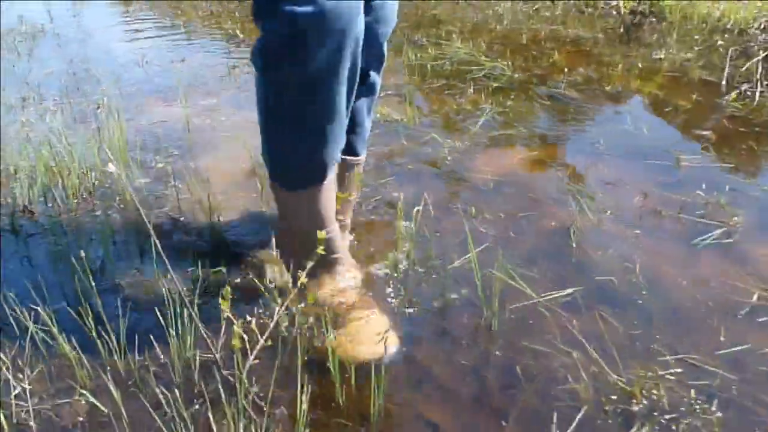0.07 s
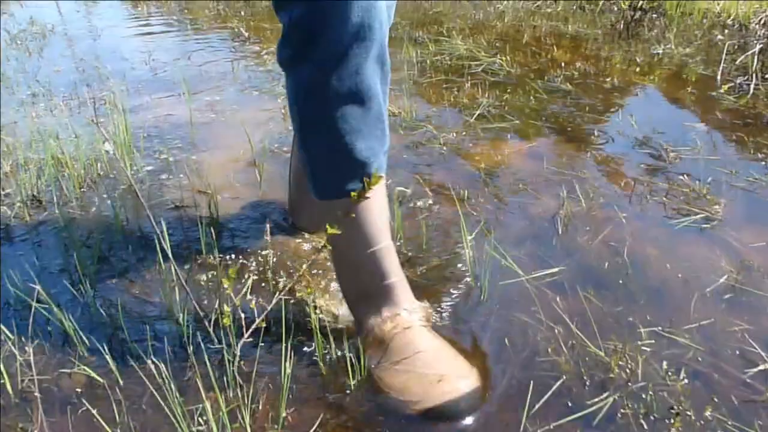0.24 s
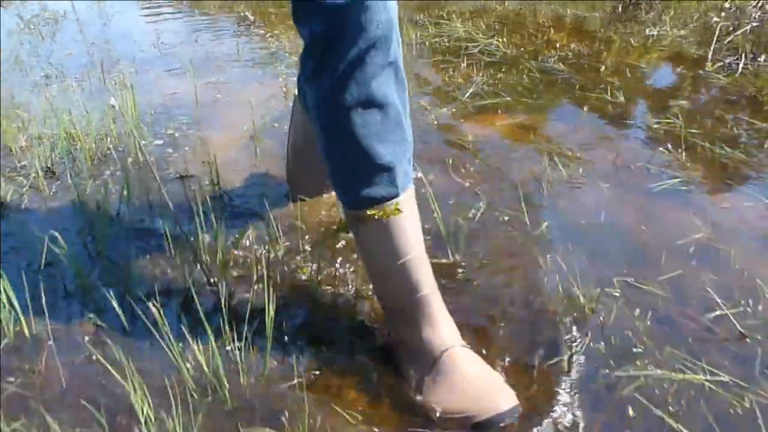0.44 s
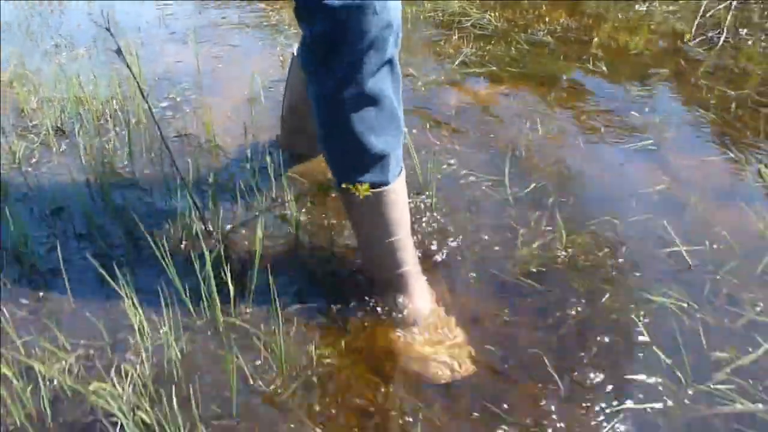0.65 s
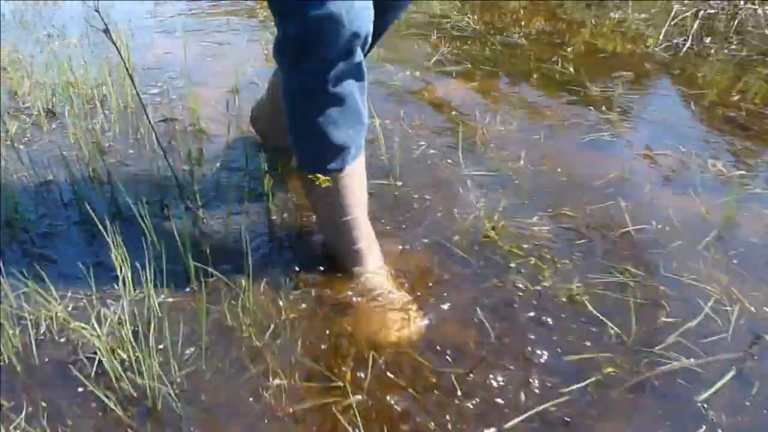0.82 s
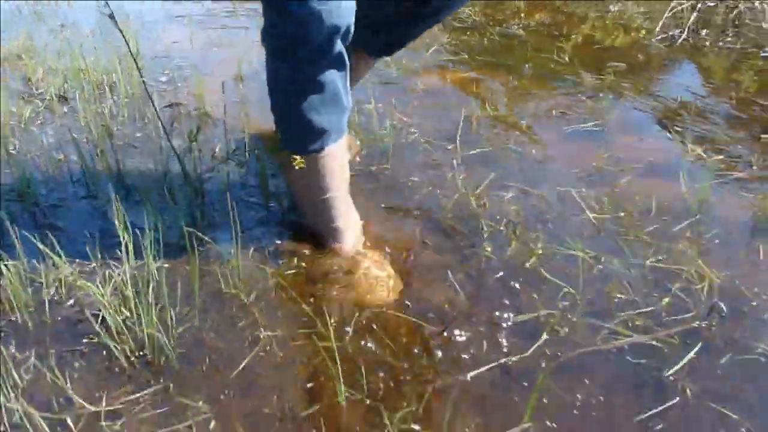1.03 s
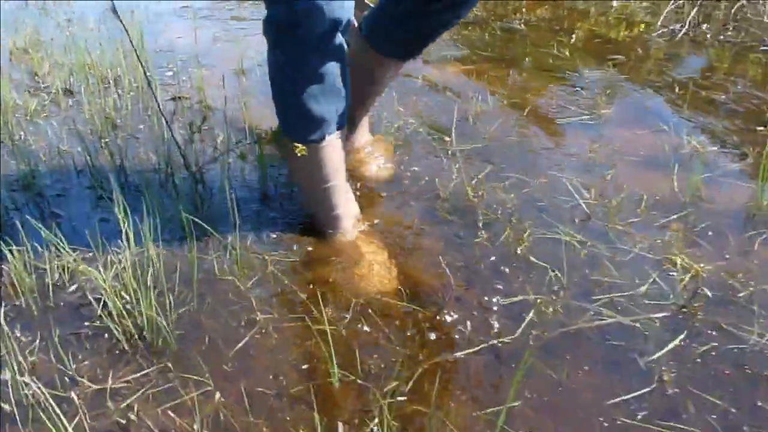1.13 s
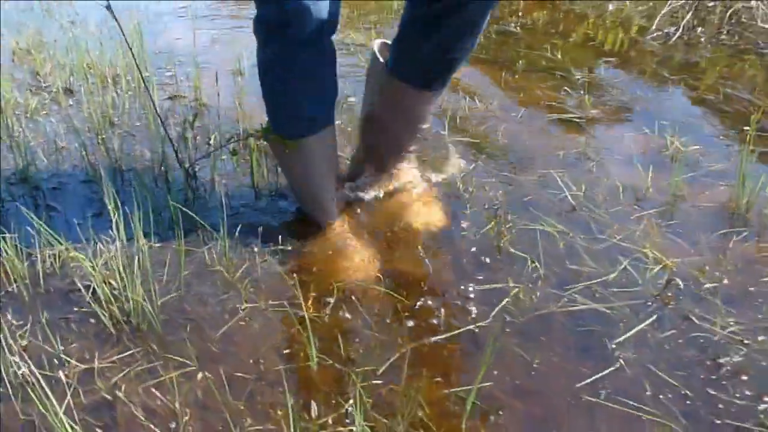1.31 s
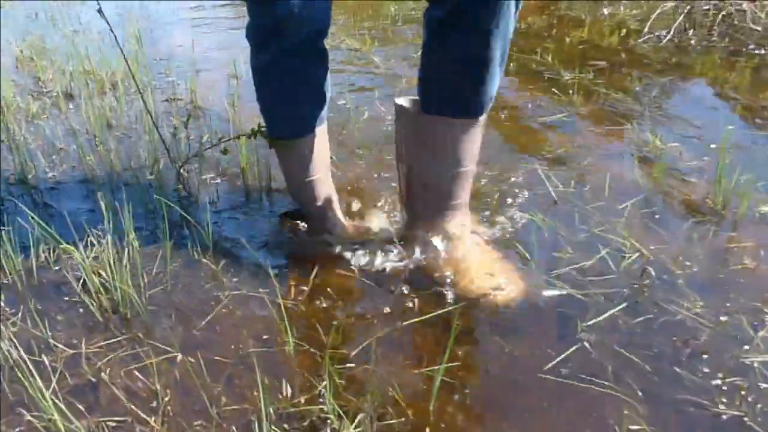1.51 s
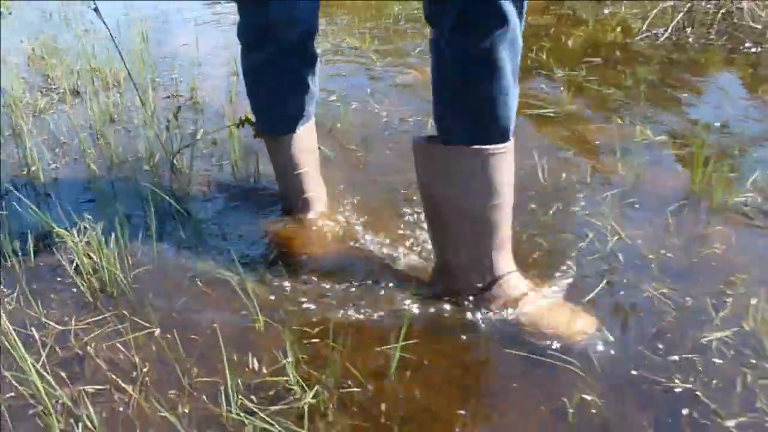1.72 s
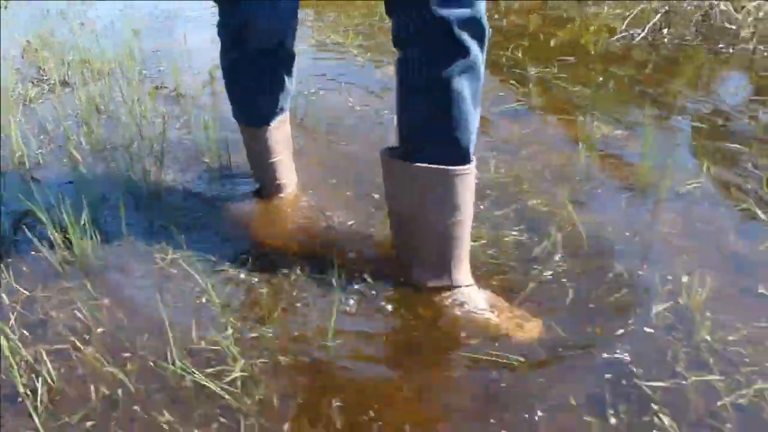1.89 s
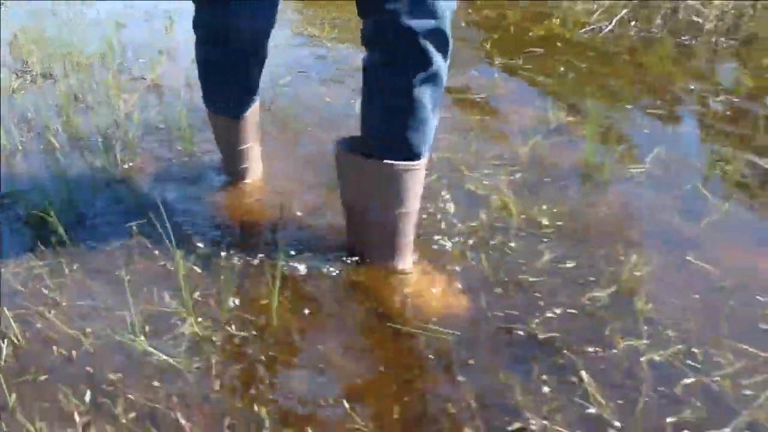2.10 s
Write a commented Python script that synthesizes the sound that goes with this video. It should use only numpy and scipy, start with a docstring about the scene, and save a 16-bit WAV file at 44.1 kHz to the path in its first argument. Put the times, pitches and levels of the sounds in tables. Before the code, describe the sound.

Close sloshing of boots wading two steps through shallow water, over a faint wind hiss.

```python
"""On a flooded meadow, close by, rubber boots wade two steps through shallow water.
Each boot slaps the surface and drags a wash of small bubbles and spray. Trapped air rings as a damped
oscillator: larger bubbles plop, most gliding upward, hollows gulp as they close, and falling drops tick.
A faint wind hisses in the grass."""
import sys
import numpy as np
from scipy import signal
from scipy.fft import rfft, irfft, next_fast_len
from scipy.io import wavfile
from scipy.ndimage import map_coordinates

SR = 44100
rng = np.random.default_rng(int(sys.argv[2]) if len(sys.argv) > 2 else 0)


def output_pcm(signal):
    """Save a mono or channel-first signal as 16-bit PCM at the path in sys.argv[1].

    Samples are clipped to [-1, 1] before scaling.
    """
    pcm = np.clip(np.atleast_2d(signal).T, -1, 1) * 32767
    wavfile.write(sys.argv[1], SR, np.round(pcm).astype(np.int16))


N = 94815

# envelope of the stirred water: time_s, level_db
STIRRING = [(0.08, -59), (0.18, -45.5), (0.26, -44), (0.42, -42.5), (0.465, -43), (0.535, -45),
            (0.6, -49.5), (0.78, -56.5), (0.99, -60.5), (1.04, -49.5), (1.11, -55), (1.25, -53.5),
            (1.4, -50.0), (1.6, -45.5), (1.7, -45.5), (1.84, -41.5), (1.98, -60), (2.13, -58.5)]
# left-right coherence of the wind and the rumble: frequency_hz, coherence
AIR_COHERENCE = [(60, 0.22), (200, 0.39), (500, 0.2), (2000, 0.18), (7000, 0.27)]
# left-right coherence of the water noise: frequency_hz, coherence
WATER_COHERENCE = [(150, .5), (500, 0.54), (7000, 0.29)]


def amp(db):
    """Decibels to amplitude ratio."""
    return 10 ** (np.asarray(db) / 20)


def unit_rms(x):
    """Normalisation to an rms of 1."""
    return x / np.sqrt(np.mean(x ** 2) + 1e-20)


def at_frequency(points, hz):
    """Interpolation of (frequency_hz, value) points on a logarithmic frequency axis."""
    knots_hz, values = np.transpose(points)
    return np.interp(np.log(hz + 1), np.log(knots_hz + 1), values)


def envelope(points):
    """Linear interpolation of (time_s, value) points at every sample."""
    return np.interp(np.arange(N) / SR, *np.transpose(points))


def wobble(rate_hz):
    """Random modulation: a spline through rate_hz Gaussian values a second."""
    return map_coordinates(rng.standard_normal(N // 10), [np.arange(N) * rate_hz / SR])


def filtered(x, response):
    """Linear filtering: the spectrum times a frequency response."""
    size = next_fast_len(N + SR // 2)
    return irfft(rfft(x, size) * response(np.fft.rfftfreq(size, 1 / SR)), size)[..., :N]


def stereo_noise(spectrum, coherence):
    """Partly coherent coloured noise of rms 1: the balance of mid and side sets the coherence."""
    def response(hz):
        angle = np.arccos(np.clip(at_frequency(coherence, hz), -1, 1)) / 2
        return amp(at_frequency(spectrum, hz)) * [np.cos(angle), np.sin(angle)]
    mid, side = filtered(rng.standard_normal((2, N)), response)
    return unit_rms(np.array([mid + side, mid - side]))


def place(start_s, sounds, pans=0):
    """Superposition of sounds, one a row, panned by amplitude."""
    index = (np.round(start_s * SR).astype(int) + np.arange(sounds.shape[1])).ravel()
    return np.array([np.bincount(index, (sounds * (1 + side * pans)).ravel(), N)[:N] for side in (1, -1)])


def wind():
    """Wind in the grass makes faint broadband flow noise, whose level sways slightly."""
    # noise spectrum: frequency_hz, density_db
    spectrum = [(15, -93), (25, -50), (209, -11.5), (236, -10), (272, -9), (345, -4.5), (380, -5.5),
                (642, -6), (1480, -18.5), (2220, -21), (2820, -19), (3490, -21), (7500, -27), (9750, -50.5),
                (16500, -120)]
    return amp(-53 + 2.1 * wobble(rate_hz=4.19)) * stereo_noise(spectrum, AIR_COHERENCE)


def bubble(t, hz, decay_s, rise_per_s, waver_cycles=0):
    """A damped oscillator of trapped air; a positive rise lifts its pitch as it nears the surface."""
    onset_cycles, burst_s = 0.55, 5.74 * decay_s  # bursting at the surface cuts the ring short
    onset = 1 - np.exp(-t * hz / onset_cycles)
    fade = np.exp(-t / decay_s - (t / burst_s) ** 4)
    cycles = hz * (t + rise_per_s * t * t / 2) + waver_cycles
    return np.sin(2 * np.pi * cycles) * fade * onset


def plops():
    """Large bubbles and single drops: a snap at pinch-off, then a resonance jostled by moving water."""
    # bubbles and drops that stand out: start_s, pitch_hz, level_db, decay_ms, relative_rise_per_s
    bubbles = [ (.008, 1036, -35.5, 8.2, 18), (0.1222, 4870, -18, 0.4, 18), (0.1264, 2480, -26, 0.83, 15),
               (0.2338, 3580, -24, 0.67, -10), (0.2453, 2230, -29, 0.75, -6), (0.261, 1210, -23.5, 2, 29),
               (0.274, 1422, -28, 7, 11.5), (0.3186, 3870, -20, 1.17, 1), (0.3203, 2910, -16.5, 0.51, 4),
               (.3197, 743, -30.5, 7.3, -5), (.349, 664, -30.5, 6.2, 17), (0.3665, 3100, -20.5, 0.57, -10),
               (0.3794, 6240, -18.5, 0.36, -2), (0.3886, 3120, -23, 1.3, -10),
               (0.451, 1073, -31.5, 32, 15.5), (0.4702, 606, -13, 8.4, -3), (0.4707, 1500, -12.5, 0.92, 3),
               (0.486, 1403, -19, 4.5, 15.5), (0.4896, 3160, -22, 2.8, -7.5), (0.4862, 952, -24, 5.5, 7.5),
               (0.496, 1610, -23, 5.5, 78), (0.5359, 5730, -36, 1.8, 18), (0.5584, 6700, -32, 2.3, 17),
               (0.6367, 2086, -22, 1.7, 95), (0.641, 916, -39.5, 16, 1), (0.696, 3630, -39.5, 2.1, 12),
               (0.707, 1523, -43, 8.6, -1), (.908, 3600, -44, 1.2, -5), (1.02, 1445, -43, 2.5, 22),
               (1.032, 4400, -28.5, 0.29, 0), (1.037, 4120, -30.5, 0.42, -26), (1.04, 498, -39.5, 9, 8.5),
               (1.0603, 810, -30, 3.6, 8), (1.0955, 900, -38, 1.8, -19), (1.133, 1210, -28, 2.5, 3),
               (1.175, 2170, -34, 1.1, -9), (1.231, 1240, -41.5, 6.8, 11), (1.2682, 2780, -30.5, 1.07, -11),
               (1.273, 4620, -19, 0.89, 13), (1.3434, 840, -16, 1.93, -11), (1.312, 2310, -29, 0.82, 28),
               (1.4535, 1086, -39, 23, 5), (1.466, 1560, -32, 2.1, 7), (1.4939, 5800, -34.5, 1.16, 4),
               (1.5, 786, -19.5, 12, 0.5), (1.5548, 397, -40.5, 18, 17), (1.5796, 590, -29.5, 6.7, 8.5),
               (1.581, 950, -30, 3.2, 9), (1.6047, 1197, -33.5, 11, 9), (1.645, 618.4, -18, 11.1, 33),
               (1.6458, 3020, -19.5, 0.42, -8), (1.6556, 5250, -12.5, 0.31, 2), (1.6593, 990, -32, 3.6, 21),
               (1.6646, 1039, -25, 5.6, 45), (1.6947, 3520, -22, 0.76, 1), (1.7303, 1745, -32, 5.5, 19),
               (1.675, 492, -33, 23, 5.5), (1.7299, 462, -28.5, 6, 5), (1.778, 455, -34, 12, 5.5),
               (1.7848, 5900, -28, 0.28, 0), (1.797, 816, -30.5, 11.5, 12.5), (1.8194, 886, -31.5, 13, 2),
               (1.825, 3000, -22, 1.2, 0), (1.8293, 3300, -24.5, 1.05, 16), (1.8573, 6170, -33, 1.1, -2),
               (1.8595, 2430, -19.5, 1.7, -7), (1.8597, 4000, -21.5, 0.47, -12),
               (1.8768, 1403, -32.5, 5, 20), (1.943, 2490, -30.5, 0.51, -10), (2.097, 3140, -39.5, 1.4, 0)]
    start_s, hz, level_db, decay_ms, rise_per_s = np.transpose(bubbles)[:, :, None]
    t = np.arange(SR // 10) / SR
    noise = rng.standard_normal((len(bubbles), 3, len(t)))
    waver_cycles, waver_db, waver_hz = 0.07, 1.75, 285
    phase = np.array([map_coordinates(row, [t * waver_hz]) for row in noise[:, 0]])
    swell = np.array([map_coordinates(row, [t * waver_hz]) for row in noise[:, 1]])
    jostle = 1 - np.exp(-t / 0.018)
    ring = bubble(t, hz, decay_ms / 1000, rise_per_s, waver_cycles * jostle * phase)
    ring *= amp(waver_db * jostle * swell)
    snap = amp(-17) * hz / 4000 * noise[:, 2] * np.exp(-t / 0.0005)  # larger bubbles snap more softly
    return place(start_s, amp(level_db) * (ring + snap))


def swarm(count, samples, pitch_hz, log_spread, decay_cycles, glide, spread_db):
    """Incoherent sum of bubbles, rms 1; glide is the mean relative rise in pitch per decay time."""
    timing, loudness, climb = rng.random((3, count, 1))
    tuning, longevity, pan = rng.standard_normal((3, count, 1))
    hz = np.clip(pitch_hz * np.exp(log_spread * tuning), 420, 7500)
    decay_s = decay_cycles / hz * np.exp(0.5 * longevity)
    t = np.arange(samples) / SR
    rings = bubble(t, hz, decay_s, 2 * climb * glide / decay_s) * np.sqrt(1 - t / t[-1])
    level_db = spread_db * np.minimum(-np.log(1 - loudness), np.pi) - 2 * longevity
    start_s = (np.arange(count)[:, None] + timing) / count * N / SR
    return unit_rms(place(start_s, amp(level_db) * rings, 0.078 * pan))


def churn():
    """Air entrained as the boots push the water: mid-sized bubbles resonate over a soft wash."""
    # spectrum of the wash: frequency_hz, density_db
    spectrum = [(100, -50), (250, -15.5), (550, 8), (1300, 4), (2500, -14.5), (5000, -49), (9000, -44)]
    gurgle = swarm(count=900, samples=1500, pitch_hz=1104.7, log_spread=0.4754,
                   decay_cycles=6, glide=0.065, spread_db=5)
    wash = stereo_noise(spectrum, WATER_COHERENCE) * amp(0.67 * wobble(rate_hz=70))
    return amp(envelope(STIRRING)) * (amp(-3) * gurgle + amp(-4.5) * wash)


def spray():
    """Tiny drops ring on impact; the harder the splash, the more they stand out of the fine hiss."""
    # envelope of the spray: time_s, level_db
    splashing = [(0.02, -56), (0.15, -51), (0.24, -44.5), (0.33, -51.5), (0.375, -43), (0.43, -48.5),
                 (0.49, -44.5), (0.53, -50), (0.62, -55.5), (0.8, -61.5), (1.25, -63.5), (1.42, -57.2),
                 (1.48, -50), (1.56, -50.5), (1.65, -50.5), (1.83, -51.5), (1.92, -64.5), (2.13, -70.5)]
    # spectrum of the hiss: frequency_hz, density_db
    spectrum = [(300, -54), (1500, 8), (3000, 0.5), (5000, -10.5), (7000, -4), (9000, -3)]
    level_db = envelope(splashing)
    drops = swarm(count=2800, samples=400, pitch_hz=3940, log_spread=0.389,
                  decay_cycles=4, glide=0.025, spread_db=5.5)
    drops_db = -2.5 + 0.26 * (level_db - level_db.mean())
    hiss = stereo_noise(spectrum, WATER_COHERENCE) * amp(2 * wobble(rate_hz=220))
    return amp(level_db) * (amp(drops_db) * drops + amp(-8.5) * hiss)


def rumble():
    """Very faint low noise, amplitude-modulated by the envelope of the stirred water."""
    # noise spectrum: frequency_hz, density_db
    spectrum = [(20, -5), (60, -4.5), (150, -15.5), (600, -64)]
    return amp(envelope(STIRRING) - 47.5) * stereo_noise(spectrum, AIR_COHERENCE)


def slaps():
    """Impacts of boots and sheets of water on the surface: noise bursts that decay exponentially."""
    # impacts: start_s, level_db, decay_s
    impacts = [(0.4692, -30.5, .007), (0.4872, -22, 0.0071), (0.6375, -31.5, 0.0014), (1.021, -47.5, .012),
               (1.3458, -39, 0.0086), (1.64, -36, 0.015), (1.6525, -37, 0.011)]
    # spectrum of an impact: frequency_hz, density_db
    spectrum = [(120, -34), (350, -9), (800, 5.5), (2000, -2.5), (3500, -8.5), (8000, -23)]
    start_s, level_db, decay_s = np.transpose(impacts)[:, :, None]
    t = np.arange(N) / SR - start_s
    bursts = amp(level_db) * np.exp(-np.abs(t) / decay_s) * (t > 0)
    return bursts.sum(axis=0) * stereo_noise(spectrum, WATER_COHERENCE)


def gulps():
    """Cavity resonance: water closes over a hollow, whose fluttering note rises as it shrinks."""
    # hollows behind a boot: start_s, length_s, first_hz, last_hz, level_db
    hollows = [(1.399, .035, 682, 840, -45), (1.873, .07, 555, 1140, -39)]
    start_s, length_s, first_hz, last_hz, level_db = np.transpose(hollows)[:, :, None]
    progress = np.minimum(np.arange(SR // 10) / SR / length_s, 1)
    hz = first_hz + (last_hz - first_hz) * progress ** 2.72  # the pitch climbs late
    swell = np.sqrt(np.abs(np.sin(np.pi * progress)))
    notes = amp(level_db) * swell * np.sin(2 * np.pi * np.cumsum(hz, axis=1) / SR)
    return place(start_s, notes) * amp(2.5 * wobble(rate_hz=200))


def scatter(x):
    """Diffuse reflection from water, legs and grass: a short tail, different for each ear."""
    t60_s, onset_s = 0.07, 0.00067
    t = np.arange(SR // 4) / SR
    tail = rng.standard_normal((2, len(t))) * amp(-60 * t / t60_s) * (1 - np.exp(-t / onset_s))
    return signal.fftconvolve(x.mean(axis=0)[None], tail / np.linalg.norm(tail[0]), axes=1)[:, :N]


def scene():
    """Superposition of the wading, its faint reflections, the rumble and the wind."""
    water = plops() + gulps() + slaps() + churn() + spray()
    low_cut = signal.butter(3, 290, "high", fs=SR, output="sos")  # bubbles and splashes radiate no bass
    water = signal.sosfilt(low_cut, water)
    return water + amp(-15.5) * scatter(water) + rumble() + wind()


def record(dry):
    """Two close, band-limited microphone ports; low notes reach the right one slightly earlier."""
    # microphone response: frequency_hz, gain_db
    sensitivity = [(20, -12), (6800, 5), (7400, 1), (7900, -16), (8300, -13), (9000, -23)]
    bass_lag_s, lag_corner_hz, cutoff_hz = 45e-6, 1900, 9006

    def response(hz):
        lag_s = bass_lag_s / (1 + (hz / lag_corner_hz) ** 2)
        phase_shift = np.exp(1j * np.pi * hz * lag_s * np.array([[-1], [1]]))
        return phase_shift * amp(at_frequency(sensitivity, hz)) * (hz < cutoff_hz)
    return filtered(dry, response)


dry = scene()
out = record(dry)
output_pcm(out)
```